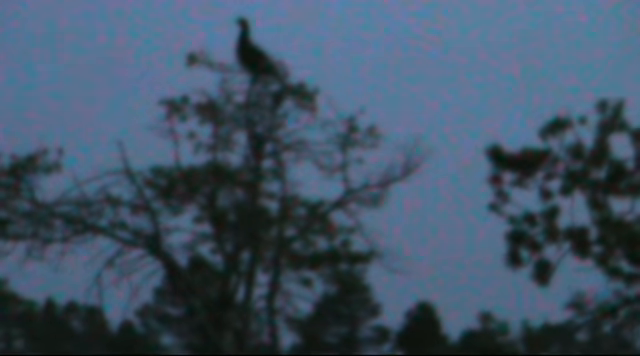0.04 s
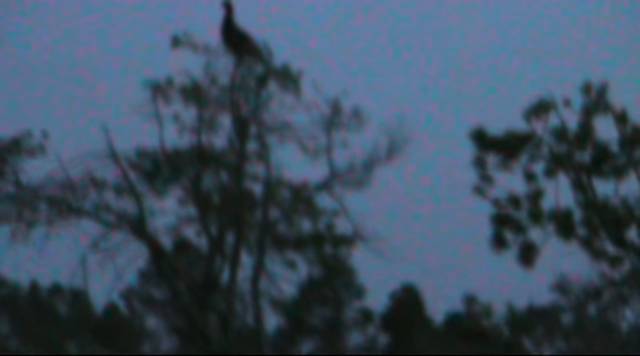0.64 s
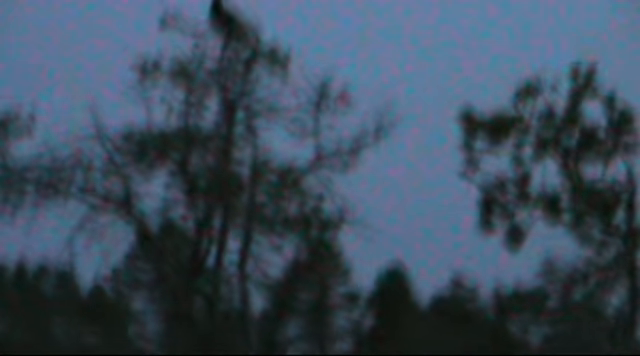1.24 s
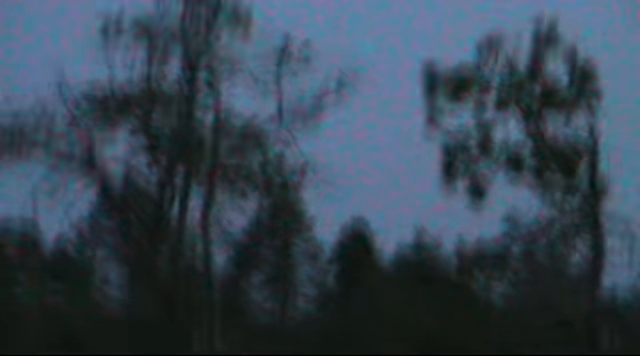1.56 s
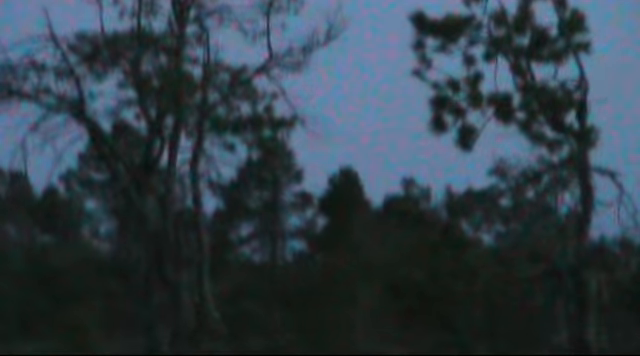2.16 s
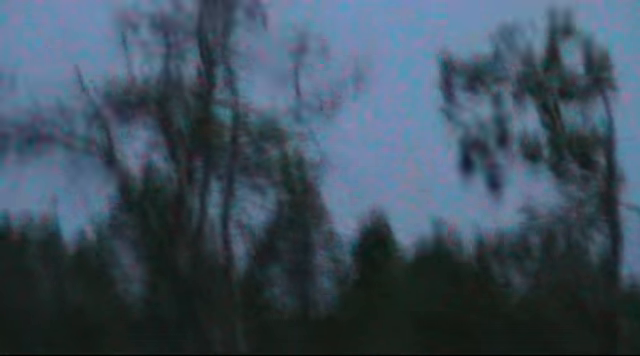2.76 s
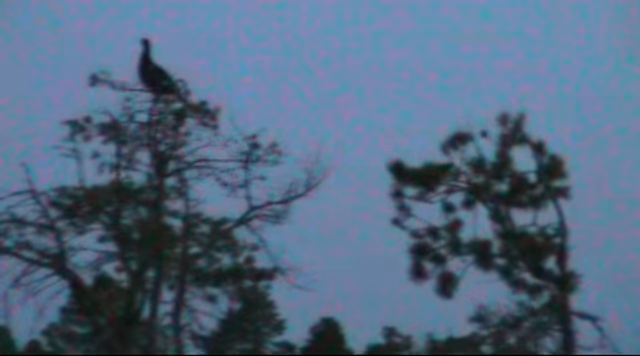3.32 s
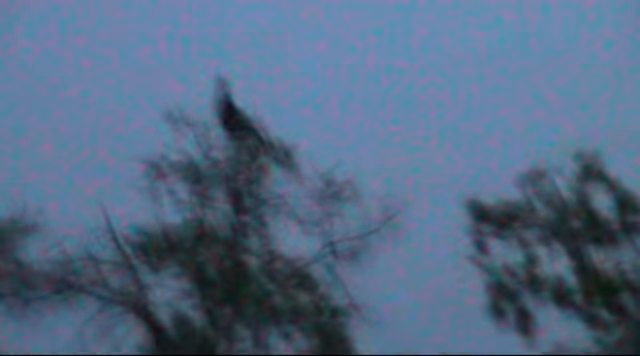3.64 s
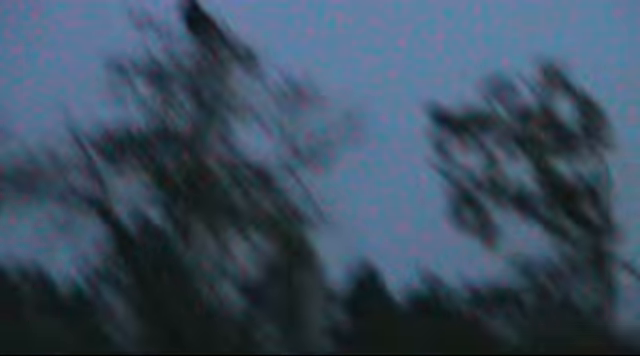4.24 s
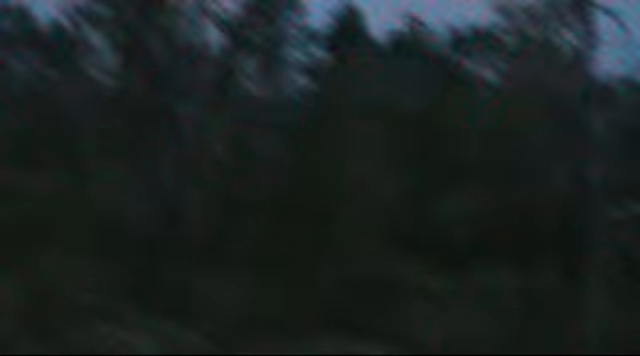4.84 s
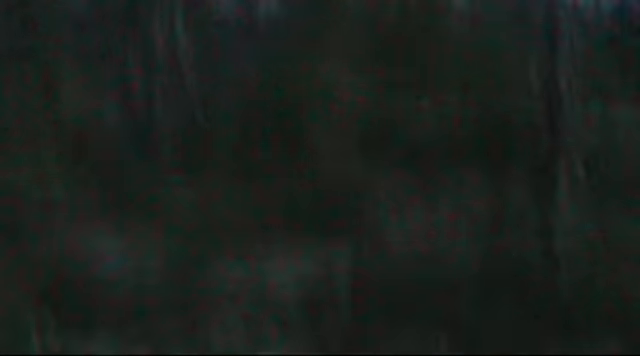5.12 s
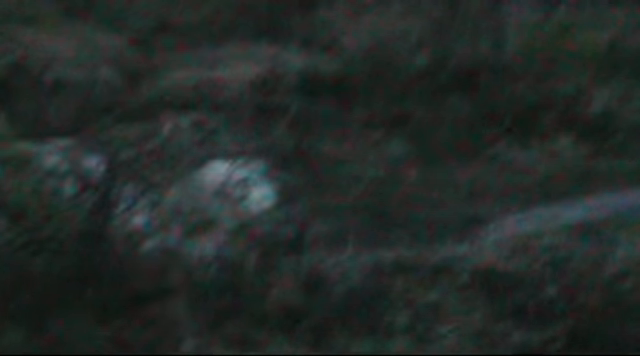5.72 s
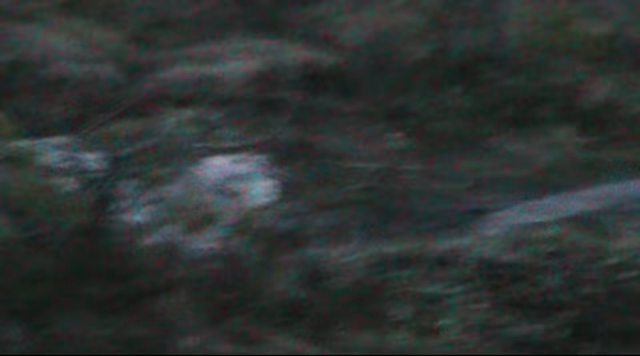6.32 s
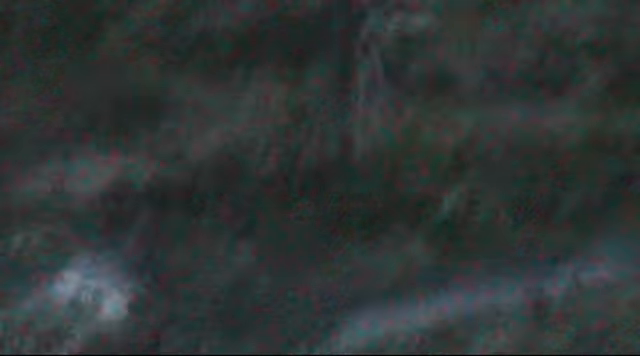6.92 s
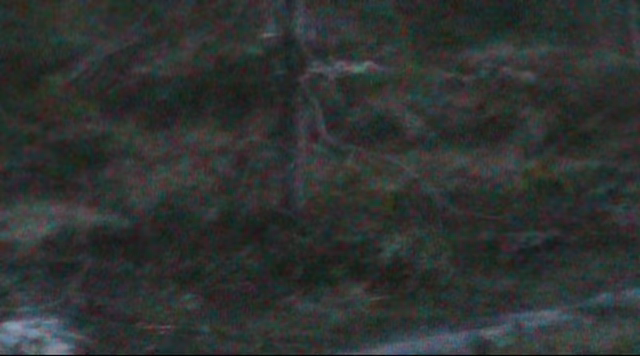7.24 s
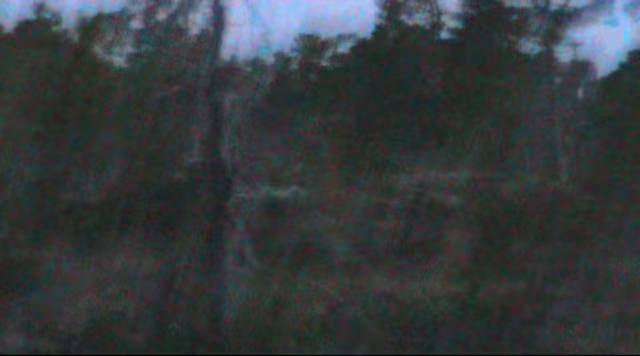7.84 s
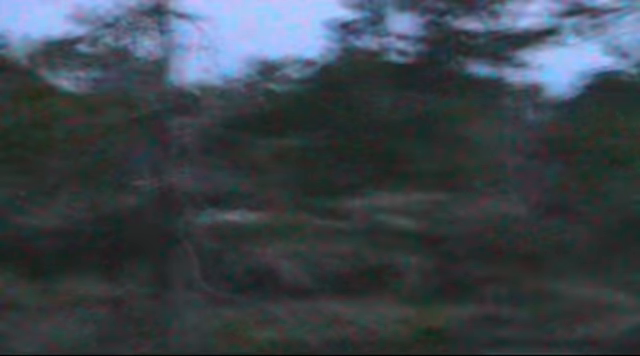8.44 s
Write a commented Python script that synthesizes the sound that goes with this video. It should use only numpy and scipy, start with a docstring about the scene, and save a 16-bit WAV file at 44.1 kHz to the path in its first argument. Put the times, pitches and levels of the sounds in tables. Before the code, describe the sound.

On a bog among scattered pines, a black grouse gives a few harsh hisses with a soft flutter of wings. Rising, bubbling rolls then alternate with phrases of low coos, lightly echoed. A fainter rival answers later, and a faint high chip repeats near the end. The hand-held camera adds steady hiss and a thin motor whine, with sharp knocks, creaks, dull bumps and puffs of wind on the microphone, busiest midway and at the close.

```python
"""Black grouse on a bog at dusk.

A cock bubbles through his swollen air sac: rising rolls of slurs, then a set phrase of held notes,
flicks and arched coos, echoed by scattered pines. A rival answers, a bird forces hisses through its
throat and flutters, and a faint high chip sets in late. A hand-held camera adds motor whine and hiss,
the knocks, creaks and bumps of fingers on its case, and buffets of air on its microphone."""
import sys
import numpy as np
from scipy import signal
from scipy.fft import rfft, irfft, next_fast_len
from scipy.io import wavfile
from scipy.ndimage import uniform_filter1d

SR = 44100
rng = np.random.default_rng(int(sys.argv[2]) if len(sys.argv) > 2 else 0)


def transcribe(u):
    """Save the signal u as a 16-bit wav file named by the first command-line argument.

    u: samples, shape (n,) or (channels, n), limited to [-1, 1]; the rate is SR.
    q: integer samples, one column per channel.
    """
    v = np.clip(np.atleast_2d(u).T, -1, 1)
    q = np.round(v * 32767).astype(np.int16)
    wavfile.write(sys.argv[1], SR, q)


N = 382347
TIME = np.arange(N) / SR

# Kinds of note in the song. Each row: fraction of the note's length, pitch ratio, relative amplitude.
SLUR_SHAPE = [(0, 1.2, 0), (.1, 1.12, .75), (.3, 1.04, 1), (.55, .97, .8), (.75, .92, .7), (.9, .87, .4),
              (1, .76, 0)]
HOLD_SHAPE = [(0, 0.83, 0.24), (.03, 1, 0.33), (0.33, 1, 0.31), (.52, 1.01, 0.27), (.7, 0.997, 0.54),
              (.84, 0.908, 0.75), (.93, 0.724, 0.07), (1, 0.54, 0.048)]
FLICK_SHAPE = [(0, 1.236, 0.081), (0.13, 1.19, 0.17), (0.25, 1.027, 0.56), (0.39, 0.982, 1.09),
               (0.53, 0.996, 0.9), (0.65, 0.85, 0.55), (.8, 0.673, 0.11), (1, 0.43, 0.094)]
ARCH_SHAPE = [(0, 0.81, 0), (.07, 0.794, 0.81), (.18, 0.788, 1.1), (.35, 1, 0.56), (.55, 1, 0.48),
              (.75, .89, .9), (.92, 0.767, 1.1), (1, 0.72, 0.026)]
LATE_ARCH_SHAPE = [(0, .72, 0.18), (.1, 0.722, .7), (.27, 0.8, 1), (.48, .92, 0.31), (.64, 1, 0.49),
                   (.8, .87, 1.15), (.91, 0.706, 0.71), (1, 0.5, 0.13)]
CREST_SHAPE = [(0, .82, 0.016), (.1, 0.9, 0.62), (.27, 0.98, 0.87), (.5, 0.98, 0.79), (.72, .89, .85),
               (.9, 0.827, 0.55), (1, 0.65, 0.024)]
# Modes of the camera case. Each row: frequency in Hz, relative level in dB, 60 dB decay time in seconds.
CASE_MODES = [(318, -17, 0.046), (400, -13.5, 0.02), (730, 1.5, .011), (910, 1, 0.013), (1054, -13, 0.06)]


def from_db(db):
    """Amplitude grows tenfold for every 20 dB."""
    return 10 ** (np.asarray(db) / 20)


def rms_one(x):
    """Normalisation to unit mean power."""
    return x / np.sqrt(np.mean(x ** 2) + 1e-20)


def in_time(rows, column=1):
    """Linear interpolation of one column at every sample."""
    columns = np.transpose(rows)
    return np.interp(TIME, columns[0], columns[column])


def at_hz(points, hz):
    """Interpolation of a spectrum on a log-frequency axis."""
    known_hz, values = np.transpose(points)
    return np.interp(np.log(hz + 1e-3), np.log(known_hz), values)


def band(x, low_hz, high_hz):
    """A band-pass filter attenuates what lies outside its edges."""
    edges = np.clip([low_hz, high_hz], 10, .45 * SR)
    return signal.sosfilt(signal.butter(2, edges, "band", fs=SR, output="sos"), x + 1e-18)


def low_pass(x, hz):
    """A second-order filter rolls off the treble."""
    return signal.sosfilt(signal.butter(2, hz, fs=SR, output="sos"), x)


def noise(colour, correlation=None):
    """Spectrally shaped noise of rms 1; stereo if a correlation between the channels is given."""
    size = next_fast_len(N)
    hz = np.arange(size // 2 + 1) * SR / size
    gain = from_db(at_hz(colour, hz)) * hz ** 2 / (hz ** 2 + 15 ** 2)
    spectrum = rfft(rng.standard_normal(size))
    if correlation is not None:
        alike = np.clip(at_hz(correlation, hz), -1, 1)
        side = rfft(rng.standard_normal(size)) * [[1], [-1]]
        spectrum = np.sqrt(1 + alike) * spectrum + np.sqrt(1 - alike) * side
    return rms_one(irfft(spectrum * gain, size)[..., :N])


def drift(rate_hz):
    """A random modulation of rms 1 glides from value to value."""
    knots = rng.standard_normal(4000)
    return rms_one(np.interp(TIME * rate_hz, np.arange(len(knots)), knots))


def evened(x, span_s):
    """Division by the running rms flattens the envelope of a noise."""
    return x / np.sqrt(uniform_filter1d(x ** 2, int(span_s * SR)) + .02)


def delayed(x, lag_s):
    """A longer path delays the sound."""
    return np.interp(TIME - lag_s, TIME, x, left=0)


def placed(x, pan_db, lag_s=0):
    """A source to the right reaches the left capsule later and weaker (negative pan)."""
    return np.array([delayed(x, lag_s) * from_db(pan_db / 2), x * from_db(-pan_db / 2)])


def ring(clicks, hz, t60):
    """A damped resonator answers each impulse with a decaying sine."""
    radius, angle = from_db(-60 / (t60 * SR)), 2 * np.pi * hz / SR
    feedback = [1, -2 * radius * np.cos(angle), radius ** 2]
    return signal.lfilter([0, np.sin(angle)], feedback, clicks + 1e-18)


def background(bog_db=-46, hiss_db=-49):
    """Far wind and birds sum to an incoherent murmur beneath the camera's hiss."""
    # Each row: frequency in Hz, relative spectral density in dB.
    bog_colour = [(30, -42), (150, -1.5), (330, -4), (520, -2.5), (680, 0), (1050, -2), (1600, -13),
                  (2500, -23), (5000, -24), (12000, -78)]
    hiss_colour = [(30, -25.5), (1000, -7), (2200, -2), (3500, -4.5), (5300, -5.5), (6400, 1), (7200, -5.5),
                   (8400, 2.5), (9400, -3.5), (10600, -9.5), (11400, 3.5), (12000, -21)]
    # Each row: frequency in Hz, correlation of the channels (limited to -1..1 in use).
    hiss_correlation = [(1000, 0.3), (3000, -0.00059), (5000, -0.25), (6400, 0.36), (7200, 0.42),
                        (8700, 0.22), (9500, -0.85), (10600, -1.11), (11500, -0.864)]
    bog = from_db(bog_db + 1.63 * drift(8)) * noise(bog_colour, [(100, .29), (1000, .46)])
    return bog + from_db(hiss_db) * noise(hiss_colour, hiss_correlation)


def drive_motor(lag_s=4.1e-5, flutter_rad=.36, faint_db=-75, faint_count=30):
    """Periodic motion radiates a line spectrum: the camera's drive whines, wavering in phase and level."""
    # Each row: frequency in Hz, left and right levels in dB before the swell, polarity (-1 is opposed).
    strong = [(2874, -75, -71, 1), (2917, -75, -65, 1), (3135, -66, -60, 1), (3155, -70, -64, 1),
              (3499, -70, -71, 1), (3585, -70, -71, 1), (3956, -72, -71, 1), (4053, -70, -70, 1),
              (4085, -71, -71, 1), (4478, -69, -71, 1), (4602, -73, -72, 1), (4699, -73, -72, 1),
              (4801, -69, -69, 1), (5372, -71, -67, 1), (5405, -67, -62, 1), (5501, -75, -72, 1),
              (5598, -74, -70, 1), (5823, -57, -60, 1), (5921, -70, -66, 1), (6067, -63, -68, 1),
              (6174, -64, -64, -1), (6271, -70, -66, 1), (6368, -59, -55, 1), (6390, -64, -60, 1),
              (6497, -69, -66, 1), (6594, -71, -65, 1), (6621, -70, -65, 1), (6719, -61, -56, 1),
              (7068, -75, -67, 1), (7166, -58, -60, -1), (7515, -65, -64, 1), (7615, -61, -63, 1),
              (7712, -59, -59, 1), (7934, -61, -67, 1), (7966, -58, -56, -1), (8063, -60, -59, 1),
              (8160, -53, -55, 1), (8511, -67, -61, 1), (8608, -64, -56, 1), (8861, -57, -57, -1),
              (9055, -63, -65, -1)]
    # Each row: time in seconds, gain in dB, depth of the waver in dB.
    swell = [(0, -1.5, 2), (1.6, -0.5, 1.7), (2.6, -1, 1.5), (3.2, 0, 1.3), (6.0, -1, 1.7), (7.2, 0.1, 1.8),
             (8.67, 0.5, 1.7)]
    flutter, out = flutter_rad * drift(9), np.zeros((2, N))
    wavers = from_db(in_time(swell) + in_time(swell, 2) * np.array([drift(5), drift(6), drift(7)]))
    faint = [(2600 + 6400 * where, *(faint_db + 2 * rng.standard_normal(2)), 1)
             for where in rng.random(faint_count)]
    for k, (hz, left_db, right_db, polarity) in enumerate(strong + faint):
        phase = 2 * np.pi * (hz * TIME + rng.random()) + flutter
        behind = 2 * np.pi * hz * lag_s if polarity > 0 else np.pi
        out[0] += from_db(left_db) * wavers[k % 3] * np.sin(phase - behind)
        out[1] += from_db(right_db) * wavers[k % 3] * np.sin(phase)
    return np.sqrt(2) * out


def lens_motor():
    """Closely spaced tones beat; the lens motor is very faint until about halfway."""
    # Each row: frequency in Hz, relative level in dB.
    lines = [(2216, -15), (2234, -7), (2239.5, 0), (2252.5, -9)]
    # Each row: time in seconds, gain in dB.
    swell = [(0, -78), (3.9, -74), (4.3, -69), (4.7, -60.5), (8.67, -60.5)]
    tones = sum(from_db(db) * np.sin(2 * np.pi * (hz * TIME + rng.random())) for hz, db in lines)
    return placed(np.sqrt(2) * from_db(in_time(swell)) * tones, pan_db=-9.5)


def rumble(gust_db=3):
    """Moving air drives the two channels in antiphase; the hand shakes both in phase."""
    # Swings of the hand. Each row: middle and half length in seconds, air and grip levels in dB.
    swings = [(1.735, .08, -23, -48), (2.695, 0.037, -23, -50), (2.951, 0.084, -32, -62),
              (3.315, .018, -22, -54), (3.53, 0.078, -19, -45), (3.938, 0.013, -21, -52),
              (4.056, 0.016, -13, -37.5), (4.225, 0.057, -20, -45), (4.558, .016, -11.5, -38),
              (4.652, 0.019, -20, -34.5), (4.775, 0.098, -45, -45), (4.998, 0.041, -32, -36),
              (5.1, 0.086, -47, -49.5), (5.9, 0.074, -39, -54), (6.239, 0.17, -34.5, -51),
              (6.688, 0.019, -33, -48), (6.92, .1, -49, -67), (7.75, .012, -34, -54),
              (8.308, .03, -30, -54), (8.41, .018, -15, -39), (8.423, 0.061, -20, -46),
              (8.517, 0.046, -32, -33), (8.625, 0.016, -33, -30.5)]
    # The hand at rest. Each row: time in seconds, draught in dB, tremor in dB.
    resting = [(0, -36.5, -55), (2.1, -34.5, -60), (2.5, -34.5, -62.5), (3.3, -35.5, -57), (4.45, -34, -59),
               (4.8, -44, -58), (5.3, -60, -61.5), (8.0, -47.5, -59), (8.67, -37, -60)]
    # Each row: frequency in Hz, relative spectral density in dB.
    buffet_colour = [(20, -10), (45, 4.5), (68, 4), (105, -2.5), (165, -11.5), (400, -27), (900, -50),
                     (2000, -57.5)]
    grip_colour = [(20, -22), (60, 1), (115, 0), (175, -7.5), (240, -14.5), (350, -13), (900, -44),
                   (2500, -48), (9000, -76)]
    air_power, hand_power = from_db(in_time(resting)) ** 2, from_db(in_time(resting, 2)) ** 2
    for middle, half, air_db, grip_db in swings:
        span = np.abs(TIME - middle) < 4 * half
        swell = np.exp(-((TIME[span] - middle) / half) ** 2)
        air_power[span] += from_db(air_db) ** 2 * swell
        hand_power[span] += from_db(grip_db) ** 2 * swell
    gusts = from_db(gust_db * np.tanh(drift(25)))
    air = np.sqrt(air_power) * gusts * evened(noise(buffet_colour), span_s=.025)
    hand = np.sqrt(hand_power) * evened(noise(grip_colour), span_s=.03)
    return air * np.array([[1], [-1]]) + hand


def case_ring(taps, vary_db=2.5):
    """The plastic case rings as a sum of modes, whose strengths vary from touch to touch."""
    return sum((-1) ** k * ring(taps * from_db(db + vary_db * drift(15)), hz, t60)
               for k, (hz, db, t60) in enumerate(CASE_MODES))


def fingers(ring_db=-6, snap_db=9, spread_db=4):
    """Friction on the case: the creeping grip makes random ticks, sliding fingertips a soft noise."""
    # Each row: time in seconds, mean ticks per second, relative level in dB.
    creep = [(0, 2.8, -36), (4.2, 6.9, -55), (4.7, 37.3, -65), (5.2, 12, -38), (6.9, 18, -38),
             (8.0, 25, -40), (8.2, 56, -44), (8.45, 90, -36), (8.67, 70, -50)]
    # Each row: time in seconds, level in dB.
    slide = [(4.66, -90), (4.7, -54), (4.76, -43.5), (4.8, -55), (4.95, -68), (5.1, -90), (6.5, -85),
             (7.0, -66), (7.9, -69), (8.1, -62), (8.3, -65), (8.55, -62), (8.67, -66)]
    # Each row: frequency in Hz, relative spectral density in dB.
    slide_colour = [(300, -14), (1000, -14), (1450, -10), (1950, 1), (2700, -12), (5000, -19), (8500, -14),
                    (11000, -40)]
    sizes = from_db(spread_db * np.minimum(rng.exponential(1, N), 2.5) + in_time(creep, 2))
    ticks = sizes * (rng.random(N) < in_time(creep) / SR)
    crackle = from_db(ring_db) * case_ring(ticks) + from_db(snap_db) * band(ticks, 1200, 2900)
    return placed(crackle + from_db(in_time(slide)) * noise(slide_colour), pan_db=-8)


def hissing(rasp_db=3):
    """Turbulent puffs of air excite a sharp throat resonance and two broad upper ones."""
    # Each row: middle and half length in seconds, resonance and bandwidth in Hz, level in dB,
    # gain of the upper resonances in dB.
    puffs = [(0.035, 0.028, 1440, 150, -34, -8), (0.136, 0.025, 1400, 220, -39, -5),
             (0.221, 0.025, 1494, 150, -28.5, -5), (0.324, 0.024, 1610, 240, -28, -1.5),
             (0.41, 0.022, 1540, 260, -31, 1.5), (0.505, 0.036, 1530, 240, -34, -1),
             (0.975, 0.011, 2660, 600, -41, 3), (1.012, 0.021, 1690, 330, -39.5, -7),
             (1.077, 0.02, 2100, 600, -37, -1), (1.175, 0.029, 2870, 700, -44.5, 5),
             (1.265, 0.015, 3340, 1000, -49, 14)]
    # Upper resonances. Each row: frequency and bandwidth in Hz, relative level in dB.
    throat = [(2100, 600, -30), (4500, 1000, -18)]
    upper = sum(from_db(db) * rms_one(band(rng.standard_normal(N), hz - width / 2, hz + width / 2))
                for hz, width, db in throat)
    air = low_pass(band(rng.standard_normal(N), 1150, 2700), 3300)
    out = np.zeros(N)
    for middle, half, hz, width_hz, level_db, upper_db in puffs:
        span = slice(0, int((middle + 6 * half) * SR))
        resonance = signal.iirpeak(hz, hz / width_hz, fs=SR)
        jet = evened(rms_one(signal.lfilter(*resonance, air[span])), span_s=.017)
        along = (TIME[span] - middle) / (1.5 * half)
        envelope = np.exp(-np.where(along < 0, np.abs(along) ** 3, along ** 2))  # steeper rise than fall
        out[span] += from_db(level_db) * envelope * (jet + from_db(upper_db) * upper[span])
    return out * from_db(rasp_db * np.tanh(drift(250)))


def forest(x, t60, width):
    """Scattering by trunks leaves an exponentially decaying tail, much alike in both channels."""
    age = TIME[:SR]
    mid, side = rng.standard_normal((2, SR)) * from_db(-60 * age / t60) * (age > .015)
    tail = mid + width * side * np.array([[1], [-1]])
    return signal.fftconvolve(x[None], tail / np.sqrt(np.sum(tail ** 2) / 2), axes=1)[:, :N]


def rolls(every_s=.0707, vary_db=1.74, vary_pitch=.014):
    """Evenly paced slurs rise in pitch and level with vocal effort."""
    # The first roll breaks off early; the last is the rival's. Each row: start and length in seconds,
    # first and last effort from 0 to 1, gain in dB, accent on the opening notes in dB.
    bouts = [(0.319, 0.64, 0.02, 0, -2.5, -11), (1.119, .919, 0.01, 1, 0.8, 2),
             (3.601, .99, 0.11, 0.96, 0.5, 0.5), (6.171, 0.92, 0.09, 0.97, -2.5, 0.5),
             (8.29, .35, 0.81, 0.76, -7, 0)]
    # Each row: effort, length in seconds, pitch in Hz, level in dB, swell over the note in dB.
    slur_by_effort = [(0, 0.065, 377.5, -40.5, -4.5), (.35, 0.056, 394, -40, -9),
                      (0.548, 0.053, 404, -36.5, -8), (0.683, 0.0537, 430.5, -32, 0),
                      (.85, .062, 515, -26, 8.5), (1, 0.0476, 532, -25, 5)]
    efforts, *laws = np.transpose(slur_by_effort)
    notes = []
    for start, span, first, last, gain_db, accent_db in bouts:
        for k, along in enumerate(np.linspace(0, 1, round(span / every_s))):
            effort = first + (last - first) * along
            length, hz, db, swell_db = (np.interp(effort, efforts, law) for law in laws)
            louder, higher = rng.standard_normal(2)
            hz *= 1 + vary_pitch * higher
            db += gain_db + accent_db * (1 - along) ** 2 + vary_db * louder
            notes.append((SLUR_SHAPE, start + k * every_s, length, hz, db, swell_db))
    return notes


def bubbling(overtone_db=-36, jitter=.013, rough_db=1.35):
    """The resonant air sac passes a nearly pure gliding tone, which throbs by interference with echoes."""
    # Reflections: the first and strongest off the ground, the later ones off near trunks. Each row: delay in
    # seconds, gain in dB.
    echoes = [(.0131, -11), (.029, -18.5), (.047, -25)]
    voice, waver = np.zeros(N), 1 + jitter * drift(180)
    for shape, start, length, hz, level_db, swell_db in rolls() + phrases():
        fraction, ratio, amplitude = np.transpose(shape)
        span = slice(int(start * SR), int((start + length) * SR))
        along = (TIME[span] - start) / length
        phase = 2 * np.pi * np.cumsum(hz * np.interp(along, fraction, ratio) * waver[span]) / SR
        envelope = np.interp(along, fraction, amplitude) * from_db(level_db + swell_db * (along - .5))
        voice[span] += envelope * (np.sin(phase) + from_db(overtone_db) * np.sin(2 * phase))
    voice *= from_db(rough_db * drift(150))  # the airflow catches a little
    return voice + sum(from_db(db) * delayed(voice, lag_s) for lag_s, db in echoes)


def wings(gain_db=-6, half_s=.01):
    """Each downstroke displaces air in a soft, low puff."""
    # Each row: time in seconds, relative peak level in dB.
    wingbeats = [(.652, -37), (.742, -35.5), (.836, -33), (.934, -32.5), (1.03, -32), (1.123, -31),
                 (1.22, -29.5)]
    # Each row: frequency in Hz, relative spectral density in dB.
    colour = [(25, -1.5), (65, 5.5), (150, -5.5), (280, -12), (900, -34), (3000, -77)]
    strokes = sum(from_db(db) * np.exp(-.5 * np.minimum(((TIME - s) / half_s) ** 2, 100))
                  for s, db in wingbeats)
    return from_db(gain_db) * strokes * evened(noise(colour), span_s=.03)


def knocks(body_gain_db=7, crack_gain_db=3, crack_s=.0023, rebound_db=-14, rebound_s=.00605):
    """A finger's impact cracks, rebounds and excites case modes whose pitch depends on the spot."""
    # Each row: start in seconds, relative body and crack levels in dB, left over right in dB,
    # pitch ratio of the modes, cutoff of the crack in Hz.
    impacts = [(1.369, -44, -35.5, 3, 0.93, 6000), (2.851, -25, -25.5, -5, .78, 10000),
               (3.469, -20, -31.5, -5.5, 1, 9000), (4.684, -22, -30, 1.5, 1.05, 9000),
               (4.729, -22, -29.5, -3, 1.07, 7060), (4.989, -46, -33.5, -3, 0.94, 8000),
               (6.784, -34, -38, -14, .9, 2300), (7.118, -38, -38, -17, 1.25, 3200),
               (7.404, -32, -37.5, -14.5, 0.91, 3000), (8.128, -50, -35.5, -7, 0.98, 4000),
               (8.389, -44, -38, -2.0, 1, 2500), (8.435, -44, -35, -9, 1, 2500),
               (8.53, -30.5, -26.5, -6.5, 0.97, 9000), (8.561, -40, -32, -0.5, 1, 2500)]
    # Each row: frequency in Hz, relative spectral density in dB.
    crack_colour = [(500, 3), (1400, 10.5), (1900, 10), (2500, -1.5), (3200, 1.5), (4500, -2.5), (6300, 1),
                    (8500, -7.5), (12000, -13)]
    out, age = np.zeros((2, N)), TIME[:SR // 10]
    tap = np.zeros(len(age))
    tap[0], tap[int(rebound_s * SR)] = 1, from_db(rebound_db)
    grit = noise(crack_colour, [(1000, .22), (9000, 0)])
    for start, body_db, crack_db, pan_db, pitch, cutoff_hz in impacts:
        span = slice(int(start * SR), int(start * SR) + len(age))
        crack = low_pass(grit[:, span] * np.exp(-age / crack_s), cutoff_hz)
        body = sum((-1) ** k * from_db(db) * ring(tap, hz * pitch, t60)
                   for k, (hz, db, t60) in enumerate(CASE_MODES))
        knock = from_db(body_db + body_gain_db) * body + from_db(crack_db + crack_gain_db) * crack
        out[:, span] += from_db([[pan_db / 2], [-pan_db / 2]]) * knock
    return out


def phrases(vary_db=.6, vary_pitch=.0065):
    """A set phrase of frequency-modulated notes recurs, never quite alike; a flick ends the loud ones."""
    # Each row: kind of note, offset and length in seconds, pitch in Hz, level and swell in dB.
    phrase = [(HOLD_SHAPE, 0.0041, .091, 546, -23.5, 4.1), (FLICK_SHAPE, .157, 0.0398, 563, -24.5, 2.7),
              (ARCH_SHAPE, .258, .072, 585, -28.5, 0), (ARCH_SHAPE, .346, .063, 545, -28, 3.8),
              (ARCH_SHAPE, .431, .064, 564, -27, 1.8), (HOLD_SHAPE, .508, .102, 526, -28.5, 20),
              (SLUR_SHAPE, .693, 0.0166, 494, -28, -1), (CREST_SHAPE, .716, .05, 550, -26, 1.5),
              (LATE_ARCH_SHAPE, .77, .07, 600, -29, 1.5), (FLICK_SHAPE, .876, .031, 576, -21, 6.6),
              (CREST_SHAPE, 0.951, 0.066, 604, -22, -0.92), (ARCH_SHAPE, 1.033, 0.0514, 560, -28.5, 0),
              (ARCH_SHAPE, 1.082, .086, 590, -29.5, 5.4)]
    # The faint one is a far rival. Each row: start in seconds, gain in dB, pitch ratio, time stretch.
    repeats = [(2.199, 1.86, 1.002, 1.0), (4.774, -0.75, 0.99, 1.0), (6.131, -7, 0.995, 0.98),
               (7.274, 0, 0.99, 1.0)]
    # Closing flicks. Each row: start in seconds, level in dB.
    closings = [(3.534, -20.5), (6.100, -22), (8.607, -22.5)]
    flick_s, flick_hz, flick_swell_db = .029, 585, 6
    notes = [(FLICK_SHAPE, start, flick_s, flick_hz, db, flick_swell_db) for start, db in closings]
    for start, gain_db, pitch, stretch in repeats:
        for shape, offset, length, hz, db, swell_db in phrase:
            louder, higher = rng.standard_normal(2)
            hz *= pitch * (1 + vary_pitch * higher)
            db += gain_db + vary_db * louder
            notes.append((shape, start + stretch * offset, length, hz, db, swell_db))
    return notes


def creaks(gain_db=-2, width=.15):
    """Stick-slip friction: each slip of the grip is a brief burst of narrow-band noise."""
    # Each row: start in seconds, pitch in Hz, relative level in dB, decay time in seconds.
    slips = [(2.31, 1097, -40, .006), (4.233, 5000, -41, .002), (4.59, 1100, -36.5, 0.0055),
             (4.761, 8000, -25.5, .0015), (4.989, 3900, -36.5, .003), (5.41, 1150, -34, .006),
             (5.491, 4000, -42.5, .005), (5.535, 1100, -37, .006), (5.833, 1100, -37.5, 0.0055),
             (6.342, 1140, -35.5, 0.01), (6.345, 2400, -44.5, 0.0072), (6.452, 2200, -45, .006),
             (6.973, 1350, -38, .004), (6.99, 2300, -41, .006), (7.088, 2100, -43, .006),
             (7.121, 1500, -38, 0.0042), (7.628, 2050, -42, .006), (7.75, 1120, -32.5, 0.0066),
             (8.07, 1180, -37, .006), (8.075, 2000, -40, .006), (8.133, 1900, -40, .006),
             (8.392, 1150, -34, .006), (8.465, 1910, -39, .006), (8.47, 1160, -34, .006),
             (8.54, 1750, -37, .006), (8.589, 2320, -40, .006), (8.604, 1186, -32.5, .005),
             (8.604, 2050, -38, 0.0034)]
    out, age = np.zeros(N), TIME[:SR // 20]
    for start, hz, db, decay_s in slips:
        rasp = rms_one(band(rng.standard_normal(len(age)), hz * (1 - width), hz * (1 + width)))
        at = int(start * SR)
        out[at:at + len(age)] += (from_db(db + gain_db) * rasp * np.exp(-age / decay_s))[:N - at]
    return placed(out, pan_db=-6)


def bumps(t60=.057, gain_db=3):
    """Soft contacts set the whole camera in damped oscillation; a firmer grip rings higher."""
    # Each row: start in seconds, pitch in Hz, relative level in dB.
    contacts = [(3.924, 80, -30.5), (4.042, 85, -24.5), (4.205, 100, -32), (4.638, 112, -23.5),
                (4.66, 150, -30), (4.884, 113, -30), (4.975, 116, -22.5), (5.0, 112, -30),
                (5.035, 130, -34), (5.851, 90, -35.5), (6.05, 80, -37), (6.165, 99, -32.5),
                (6.265, 74.6, -33), (6.36, 80, -36), (8.43, 114, -24), (8.462, 190, -31), (8.49, 233, -31),
                (8.607, 114, -23.5), (8.613, 250, -26.5), (8.64, 180, -30)]
    out, age = np.zeros(N), TIME[:SR // 5]
    for start, hz, db in contacts:
        thud = from_db(db + gain_db - 60 * age / t60) * np.sin(2 * np.pi * hz * age)
        at = int(start * SR)
        out[at:at + len(age)] += thud[:N - at]
    return band(out, 35, 300)


def chips(level_db=-53, from_s=6.032, every_s=.32, half_s=.006):
    """Periodic pulses of narrow-band noise are heard as a faint high chip."""
    pulses = sum(np.exp(-np.minimum(((TIME - s) / half_s) ** 2, 50))
                 for s in np.arange(from_s, TIME[-1], every_s))
    treble = rms_one(band(rng.standard_normal(N), 3050, 3500))
    return placed(from_db(level_db) * pulses * treble, pan_db=-3)


def scene():
    """Superposition of the birds, their reverberation among the pines and the camera's own sounds."""
    coo, hiss = bubbling(), hissing()
    birds = placed(coo, pan_db=-.1, lag_s=4.9e-5) + placed(hiss, pan_db=-2.3, lag_s=3e-5) + wings()
    tails = from_db(-16.5) * forest(coo + hiss, t60=.38, width=.47)
    tails += forest(from_db(-31) * coo + from_db(-20) * hiss, t60=1.9, width=.45)
    handling = knocks() + bumps() + creaks() + fingers() + rumble()
    return birds + tails + handling + chips() + drive_motor() + lens_motor() + background()


def record(dry):
    """An elliptic low-pass filter cuts the treble steeply."""
    cutoff_hz = 11886
    return signal.sosfilt(signal.ellip(10, .2, 80, cutoff_hz, fs=SR, output="sos"), dry)


dry = scene()
out = record(dry)
transcribe(out)
```